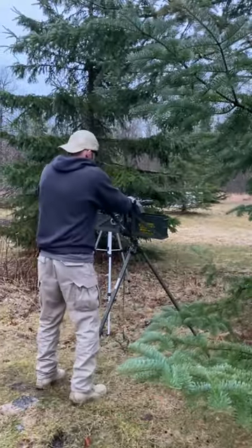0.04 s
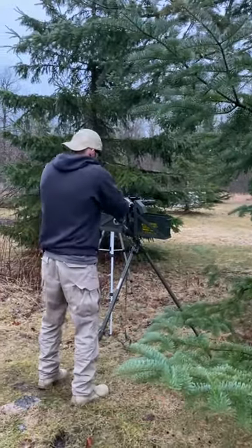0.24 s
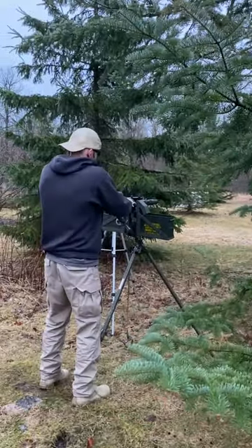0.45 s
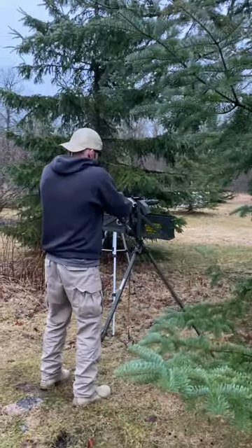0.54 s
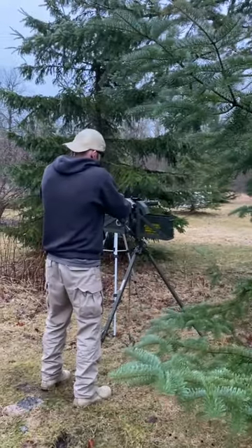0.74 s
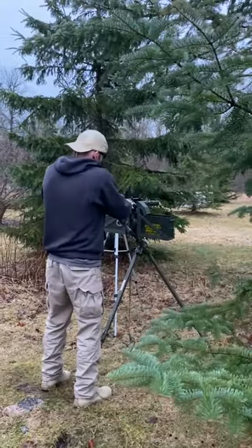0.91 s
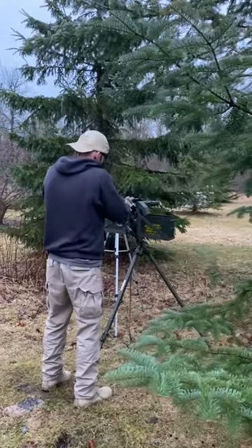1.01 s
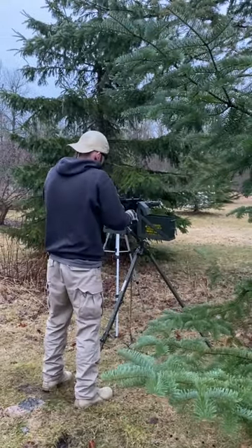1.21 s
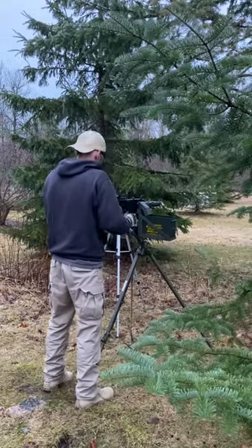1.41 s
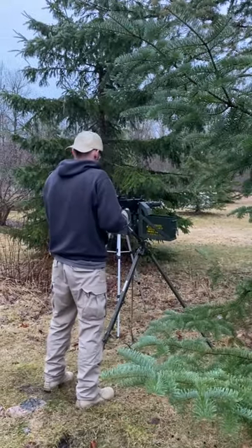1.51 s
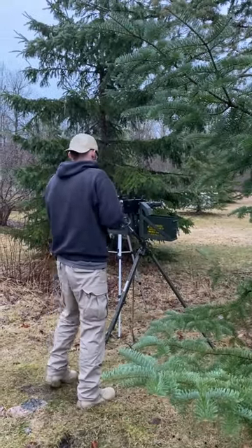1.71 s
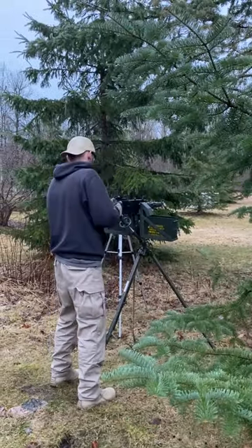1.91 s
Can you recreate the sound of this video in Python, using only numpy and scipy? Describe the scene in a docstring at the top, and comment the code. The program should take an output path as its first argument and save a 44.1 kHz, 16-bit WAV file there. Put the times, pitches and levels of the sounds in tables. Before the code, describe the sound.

A mounted machine gun's action is worked outdoors, heard from a few metres: a tap, a steel scrape, several ringing clanks with rattling loose parts, then the bolt closes with a brief squeal. Surrounding trees return a faint tail.

```python
"""A light tap, then a steel scrape and slam: a heavy machine gun on a tripod is cocked by hand.
A few metres away, the bolt slides back, the action clanks, belt links click and the bolt runs home.
Sliding steel catches in tiny contacts and squeals; each blow rings the receiver and shakes the mount.
Loose parts chatter, and the trees return a faint tail over still outdoor air."""
import sys
import numpy as np
from scipy import signal
from scipy.fft import rfft, irfft, next_fast_len
from scipy.io import wavfile

SR = 44100
rng = np.random.default_rng(int(sys.argv[2]) if len(sys.argv) > 2 else 0)


def put_to_file(sound):
    """Save the sound as 16-bit audio at rate SR, in the file named by the first command-line argument."""
    columns = np.atleast_2d(sound).T  # one column per channel
    safe = np.clip(columns, -1, 1)
    whole_steps = np.round(safe * 32767)
    wavfile.write(sys.argv[1], SR, whole_steps.astype(np.int16))


N = 85995
T = np.arange(N) / SR
T60_EXPONENT = -0.23  # higher modes die sooner


def amp(db):
    """Decibels to gain."""
    return 10 ** (np.asarray(db) / 20)


def lookup(table, hz):
    """Table value, interpolated along log frequency."""
    table_hz, value = np.transpose(table)
    return np.interp(np.log(hz + 1), np.log(table_hz), value)


def unit_rms(x):
    """Scales to rms 1."""
    return x / np.sqrt(np.mean(x ** 2) + 1e-20)


def add(mix, start_s, sound):
    """Mixes a sound in at start_s."""
    part = mix[:, max(round(start_s * SR), 0):][:, :sound.shape[-1]]
    part += sound[..., :part.shape[1]]


def decay(t60_s, t=T):
    """Exponential fall, 60 dB in t60_s."""
    return np.exp(-np.log(1000) * t / t60_s)


def damp(x, t60_table):
    """Decays each band at its own rate."""
    hz, t, bands = signal.stft(x, SR, nperseg=256)
    bands = bands * decay(lookup(t60_table, hz)[:, None], t)
    return signal.istft(bands, SR, nperseg=256)[1][:, :N]


# Stereo balance (frequency [Hz], left minus right [dB])
BALANCE_DB = [(350, 1), (700, 4), (1800, 0.5)]
def pan(hz):
    """Left and right gains."""
    return amp(np.array([[.5], [-.5]]) * lookup(BALANCE_DB, hz))


# Left-right likeness (frequency [Hz], coherence before clipping [ratio])
COHERENCE = [(1400, 1.57), (2800, -0.0247), (6500, 0.59), (9500, 0), (12000, -1.23)]
def noise(spectrum, envelope=1, top_hz=13500, rolloff_db_per_hz=.008):
    """Countless close modes: enveloped stereo noise through a filter of unit rms gain."""
    size = 2 * next_fast_len(N // 2 + SR // 20)
    hz = np.fft.rfftfreq(size, 1 / SR)
    a, b = rfft(rng.standard_normal((2, N)) * envelope, size)
    coherence = np.clip(lookup(COHERENCE, hz), -.95, .998)
    mid, side = a * np.sqrt((1 + coherence) / 2), b * np.sqrt((1 - coherence) / 2)
    gain = unit_rms(amp(lookup(spectrum, hz) - rolloff_db_per_hz * np.maximum(hz - top_hz, 0)))
    cepstrum = irfft(np.log(gain))[:size // 2]
    cepstrum[1:] *= 2  # minimum phase keeps attacks sharp
    response = np.exp(rfft(cepstrum, size))
    return irfft(np.array([mid + side, mid - side]) * pan(hz) * response)[:, :N]


def contacts(envelope, per_s, spectrum, t60_s, parts=6):
    """Uneven little impacts, shared among several ringing parts."""
    elapsed_hits = np.cumsum(rng.exponential(1, N // 64 + 1).repeat(64)[:N]) * per_s / SR
    is_hit = np.diff(np.floor(elapsed_hits), prepend=0) > 0
    hits = unit_rms(is_hit * rng.choice([-1, 1], N)) * envelope
    struck_part = rng.integers(0, parts, N)
    out = np.zeros((2, N))
    for part in range(parts):
        ring = noise(spectrum, decay(t60_s))
        ring /= np.linalg.norm(ring[0])
        out += signal.fftconvolve((hits * (struck_part == part))[None], ring, axes=1)[:, :N]
    return out


# Air spectrum (frequency [Hz], relative level [dB])
AIR_SPECTRUM = [(20, -37.5), (56, -9.5), (150, -18.5), (2500, -24), (10000, -45.5)]
def air(level_db=-66):
    """Still outdoor air: a faint, low hush."""
    return amp(level_db) * noise(AIR_SPECTRUM)


# Decay among the trees (frequency [Hz], T60 [s])
WOODS_T60_S = [(150, 0.85), (4000, 1.225), (9000, 0.25)]
def woods(source, level_db=-27, build_s=0.09):
    """Trunks and branches scatter a thin, long tail."""
    tail = damp(noise([(3500, -4.5), (12000, -8.5)]), WOODS_T60_S) * np.minimum(T / build_s, 1)
    tail /= np.linalg.norm(tail[0])
    return amp(level_db) * signal.fftconvolve(source[:1], tail, axes=1)[:, :N]


# Shaking of loose parts (time [s], level [dB])
SHAKE_DB = [(.19, -60), (.205, -30), (.256, -29), (.3, -24), (.45, -39), (.74, -38), (.82, -54), (.9, -41),
            (1.04, -35), (1.255, -35), (1.3, -47), (1.46, -68)]
def chatter(hits_per_s=260, ring_db=-1.5):
    """Belt, box and mount rattle and ring the receiver, first with the bolt back, then home."""
    times_s, db = np.transpose(SHAKE_DB)
    shake = amp(np.interp(T, times_s, db)) * (T > times_s[0]) * (T < times_s[-1])
    rattle = contacts(shake, hits_per_s, CLANG_SPECTRUM, t60_s=0.11)
    is_home = T > BOLT_SLIDES[-1][0]
    ring = np.zeros((2, N))
    for home in (0, 1):
        modes = receiver(home) * decay(t60_s=0.37)
        ring += signal.fftconvolve(rattle[:1] * (is_home == home), modes, axes=1)[:, :N]
    return rattle + amp(ring_db) * rattle.std() * unit_rms(ring)


# Knocked handle and catches (time [s], pitch [Hz], level [dB])
CATCH_RINGS = [(0.8373, 2566, -37.5), (0.8338, 1230, -34), (0.9, 2570, -34.5), (1.238, 4500, -50.5),
               (1.237, 5626, -51), (1.399, 3040, -56)]
def catches(t60_1khz_s=0.53):
    """Handle and catches ring on, each at its own pitch."""
    out = np.zeros((2, N))
    for start_s, hz, db in CATCH_RINGS:
        t60_s = t60_1khz_s * (hz / 1000) ** T60_EXPONENT
        add(out, start_s, pan(hz) * amp(db) * np.sin(2 * np.pi * hz * T) * decay(t60_s))
    return out


# Taps and ticks (time [s], pitch [Hz], relative level [dB])
LIGHT_TAPS = [(0.007, 1088, -21.5), (0.1065, 700, -49), (0.138, 1020, -46), (0.192, 990, -22),
              (0.2089, 1015, -9), (1.601, 4700, -52)]
def taps(rise_cycles=1.62, t60_cycles=17.4):
    """Notes that die within a few cycles: hollow when low, a tick when high."""
    out = np.zeros((2, N))
    for start_s, hz, db in LIGHT_TAPS:
        envelope = (1 - np.exp(-hz * T / rise_cycles)) * decay(t60_cycles / hz)
        add(out, start_s, 2 * amp(db) * np.sin(2 * np.pi * hz * T) * envelope)
    return out


# Link spectrum (frequency [Hz], relative level [dB])
LINK_SPECTRUM = [(200, -36.5), (750, 3.5), (1500, -7), (2600, -1), (4600, -6), (5900, 0.5), (7700, -10.5),
                 (10000, -4.5), (13500, -4)]
# Belt links and small catches (time [s], relative level [dB])
LINK_CLICKS = [(0.171, -46), (0.2454, -22), (0.6053, -23.5), (0.6282, -23.5), (0.6665, -25), (0.6801, -28),
               (0.7663, -23.5), (0.8357, -26.5), (0.844, -26.5), (0.893, -31.5), (0.8993, -25.5),
               (0.945, -24.5), (1.016, -29), (1.0512, -14), (1.238, -38.5), (1.398, -58)]
def links(rise_s=0.0014, tail_db=-9.5, body_db=-18.5, ping_db=-5.5, ping_range_hz=(3480, 9390), modes=6):
    """Small steel parts snap; each pings in its own modes and faintly rings the receiver."""
    rings, snap_power = np.zeros((2, N)), np.zeros((1, N))
    body = amp(body_db) * receiver(home=0)
    snap = decay(t60_s=0.0067) + decay(t60_s=0.05) + amp(tail_db) * decay(t60_s=0.28)
    snap *= 1 - np.exp(-T / rise_s)
    t = T[:SR // 4]
    ping_envelope = decay(t60_s=0.11, t=t) * (1 - np.exp(-t / rise_s))
    for start_s, db in LINK_CLICKS:
        add(snap_power, start_s, (amp(db) * snap) ** 2)
        add(rings, start_s, amp(db) * body)
        for hz in rng.uniform(*ping_range_hz, modes):
            ping = np.sin(2 * np.pi * (hz * t + rng.random((2, 1)))) * ping_envelope
            add(rings, start_s, amp(db + ping_db + lookup(LINK_SPECTRUM, hz)) * ping)
    return noise(LINK_SPECTRUM, np.sqrt(snap_power)) + rings


# Scrape spectrum (frequency [Hz], relative level [dB])
SCRAPE_SPECTRUM = [(170, -27.5), (1000, -3.5), (3200, 6), (4700, -11.5), (6300, 3.5), (7700, -7),
                   (10200, -2), (13500, -13.5)]
# Steel on steel (time [s], length [s], mid-slide level [dB], swell [dB], squeal [dB])
BOLT_SLIDES = [(0.1905, .016, -28, 3, -48), (0.2065, .014, -17, -2, -34), (1.029, .011, -24, 12, -36),
               (1.0392, .009, -15, 1, -20), (1.052, .008, -18, -3, -13)]
def slides(release_s=0.0032, squeal_hz=3440, spread_hz=37, tones=12, tail_db=-33.5):
    """Sliding steel catches in dense tiny contacts and squeals in a rough cluster of close tones."""
    friction, squeal = np.zeros((1, N)), np.zeros((2, N))
    for start_s, length_s, db, swell_db, squeal_db in BOLT_SLIDES:
        progress = np.minimum(T / length_s, 1)
        after_s = np.maximum(T - length_s, 0)
        add(friction, start_s, amp(db + swell_db * (progress - 0.5)) * np.exp(-after_s / release_s))
        ring = decay(t60_s=.07, t=after_s) + amp(tail_db) * decay(t60_s=1.24, t=after_s)
        cluster = np.zeros((2, N))
        for hz in squeal_hz + spread_hz * rng.uniform(-0.68, 1, tones):
            phase = rng.random() + .5 * rng.random((2, 1))
            cluster += np.sin(2 * np.pi * (hz * T + phase)) / np.sqrt(tones)
        add(squeal, start_s, amp(squeal_db) * cluster * progress * ring)
    return contacts(friction[0], per_s=2100, spectrum=SCRAPE_SPECTRUM, t60_s=0.019) + squeal


# Receiver and mount modes (frequency [Hz], level with bolt back [dB], level with bolt home [dB])
RECEIVER_MODES = [(206, -19.5, -12.5), (243, -23.5, -7.5), (379, -7.5, -4), (392.5, -12.5, -1),
                  (538, -4, -16.5), (566, -2, -17.5), (587, -12.5, -6.5), (625, -12, -12.5),
                  (758.6, -6.5, -13), (759.7, -5.5, -3), (874.7, -5, -9.5), (1166, -6, -21.5),
                  (1280, -5, 0.5), (1422, -8, -20.5), (1699, -8.5, -15), (1867, -1.5, -23),
                  (2073, -15.5, -11), (2363, -8.5, -10), (2434, -5.5, -19.5)]
def receiver(home, t60_1khz_s=0.55, rise_s=0.012):
    """The gun's clear modes; their mix follows the bolt position (0 back, 1 home)."""
    out = np.zeros((2, N))
    for hz, back_db, home_db in RECEIVER_MODES:
        t60_s = t60_1khz_s * (hz / 1000) ** T60_EXPONENT
        gain = (1 - home) * amp(back_db) + home * amp(home_db)
        out += pan(hz) * gain * decay(t60_s) * np.sin(2 * np.pi * (hz * T + rng.random()))
    return out * (1 - np.exp(-T / rise_s))


# Spectra of a blow's layers (frequency [Hz], relative level [dB])
CRACK_SPECTRUM = [(200, -31.5), (700, -5.5), (3400, -8.5), (4500, -8.5), (6200, 2), (7800, -7),
                  (10300, -5.5), (13500, -11)]
KNOCK_SPECTRUM = [(150, -48.5), (560, -8), (800, 5), (1050, -17.5), (2800, -12), (6000, -50)]
CLANG_SPECTRUM = [(60, -44), (170, -30.5), (330, -0.5), (450, -10), (560, -2), (800, 4.5), (980, -3),
                  (2600, -1.5), (4400, -10.5), (10000, -16.5), (13500, -26.5)]
THUD_SPECTRUM = [(25, -33.5), (55, -11), (165, -10), (215, -0.5), (370, 2.5), (2000, -47.5)]
# Clang decay (frequency [Hz], T60 [s])
CLANG_T60_S = [(200, 0.94), (2000, 0.42), (12000, 0.37)]
# Blows of the action (time [s], crack [dB], knock [dB], clang [dB], clang treble offset [dB],
# receiver ring [dB], mount thud [dB], bolt home [0-1])
ACTION_BLOWS = [(0.2584, -17, -25, -13.5, 1, -19.5, -26, 0.29),
                (0.506, -23.5, -9.5, -20.5, -3, -21.5, -39.5, 0),
                (0.7063, -16, -20, -32.5, -1.5, -32.5, -73, 0),
                (1.041, -19, -24, -25, -1.5, -27, -33.5, 0.92),
                (1.242, -37, -35, -37, -22, -42.5, -40.5, 1)]
def blows(treble_hz=3300, thud_rise_s=0.016):
    """Each blow cracks, knocks, sets the steel clanging and shakes the mount."""
    out = np.zeros((2, N))
    thud_envelope = decay(t60_s=0.48) * np.minimum(T / thud_rise_s, 1) ** 2
    for start_s, crack_db, knock_db, clang_db, treble_db, ring_db, thud_db, home in ACTION_BLOWS:
        crack = amp(crack_db) * noise(CRACK_SPECTRUM, decay(t60_s=0.1))
        knock = amp(knock_db) * noise(KNOCK_SPECTRUM, decay(t60_s=0.092))
        spectrum = [(hz, db + treble_db * (hz > treble_hz)) for hz, db in CLANG_SPECTRUM]
        clang = amp(clang_db) * damp(noise(spectrum), CLANG_T60_S)
        ring = amp(ring_db) * receiver(home)
        thud = amp(thud_db) * noise(THUD_SPECTRUM, thud_envelope)
        add(out, start_s, crack + knock + clang + ring + thud)
    return out


def scene():
    """The gun, its tail from the trees and the outdoor air."""
    gun = blows() + slides() + links() + taps() + catches() + chatter()
    return gun + woods(gun) + air()


def record(dry):
    """Full-scale clip, then a 16.5 kHz low-pass."""
    lowpass = signal.firwin(511, 16500, window=("kaiser", 9), fs=SR)
    return signal.oaconvolve(np.clip(dry, -1, 1), lowpass[None], "same")


dry = scene()
out = record(dry)
put_to_file(out)
```